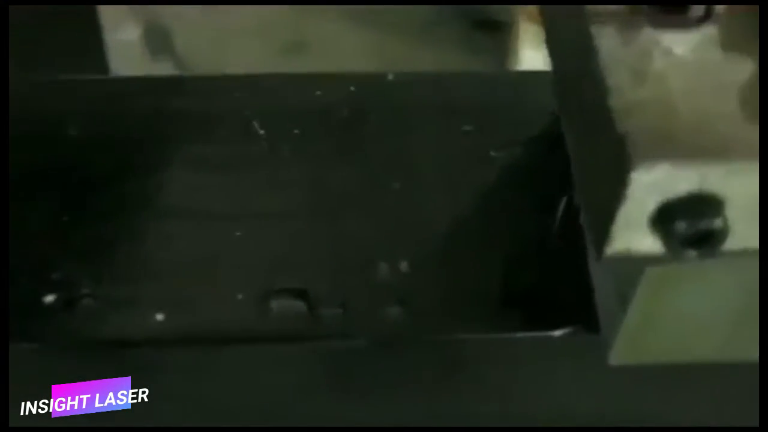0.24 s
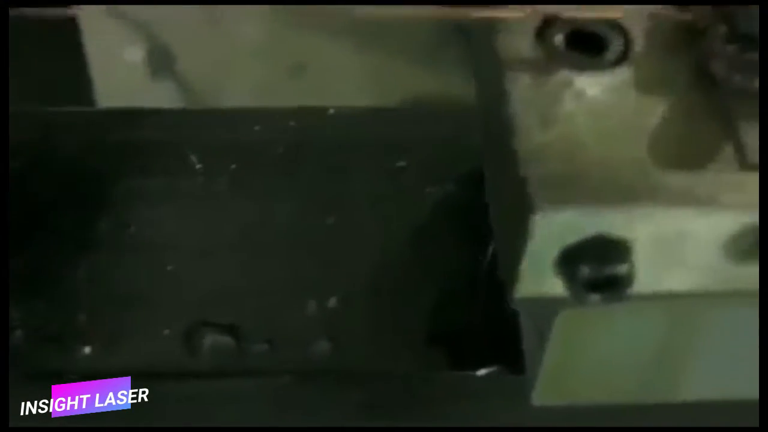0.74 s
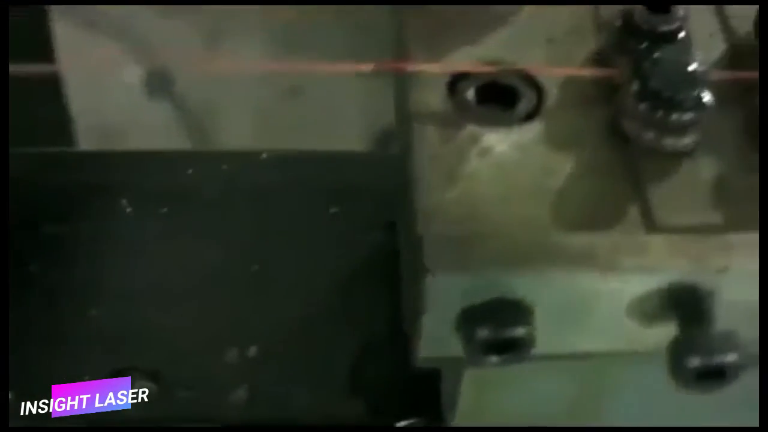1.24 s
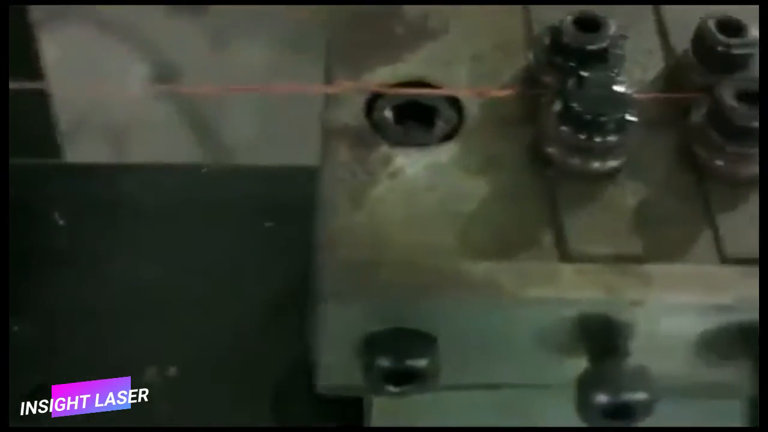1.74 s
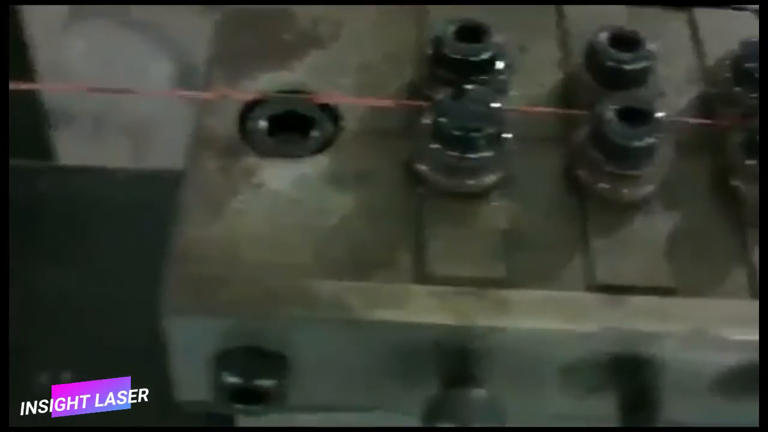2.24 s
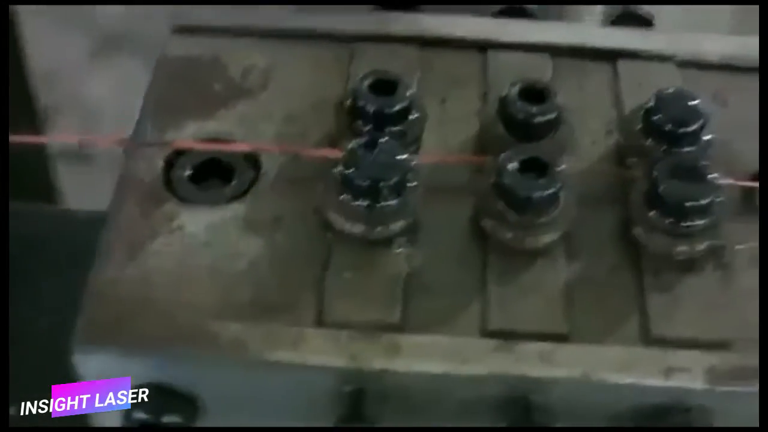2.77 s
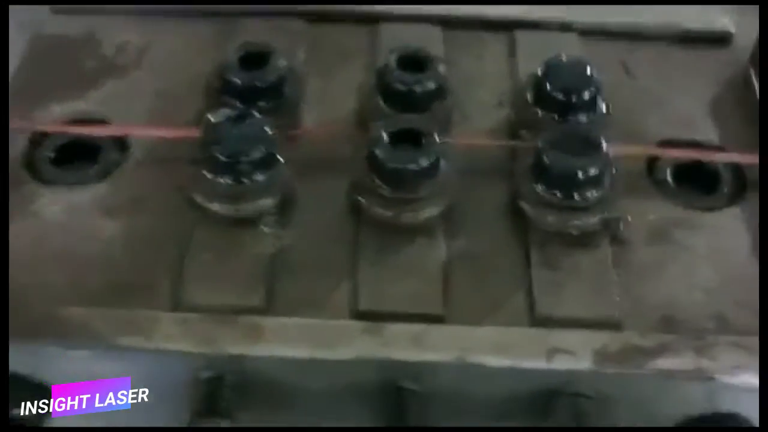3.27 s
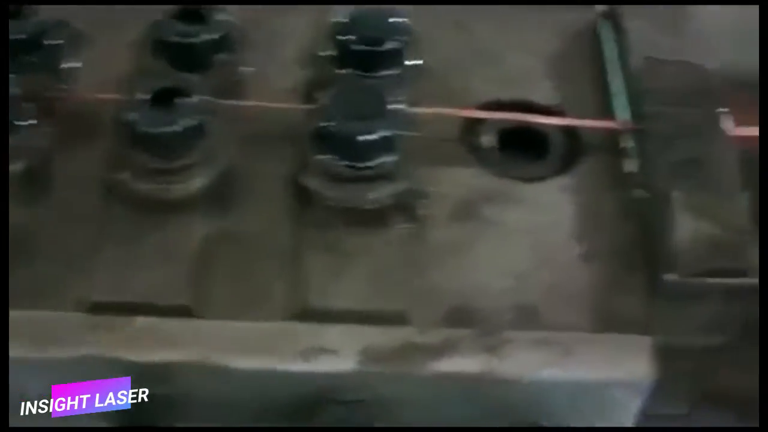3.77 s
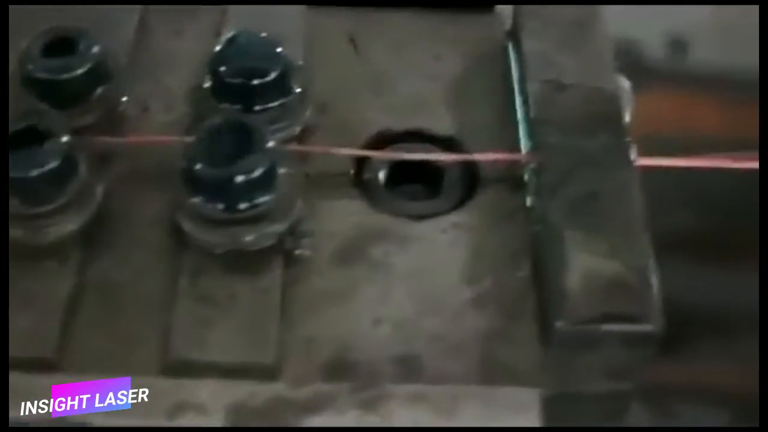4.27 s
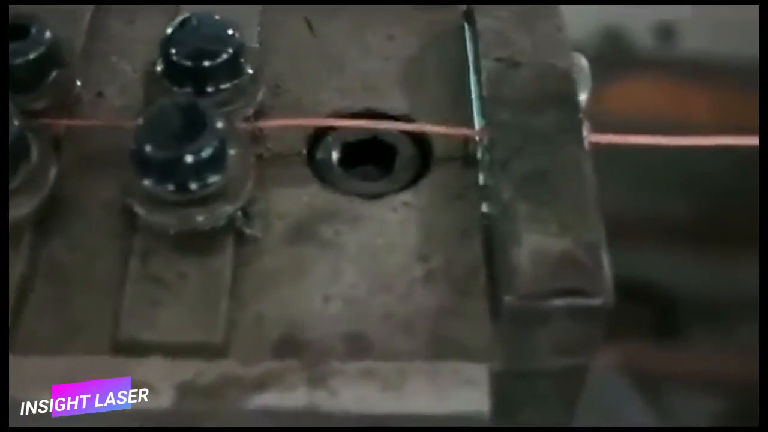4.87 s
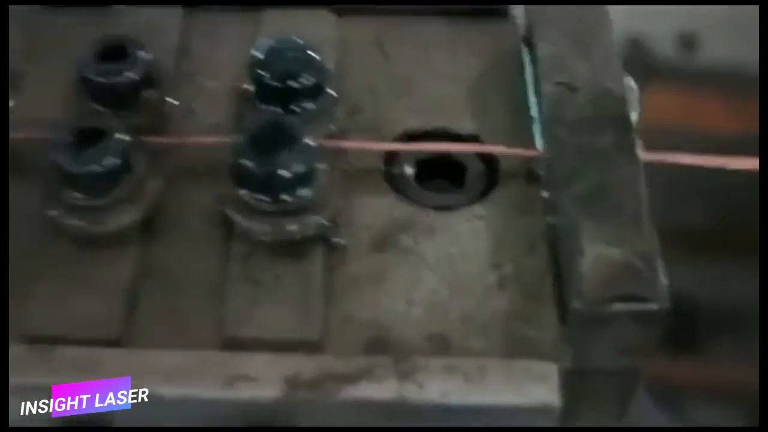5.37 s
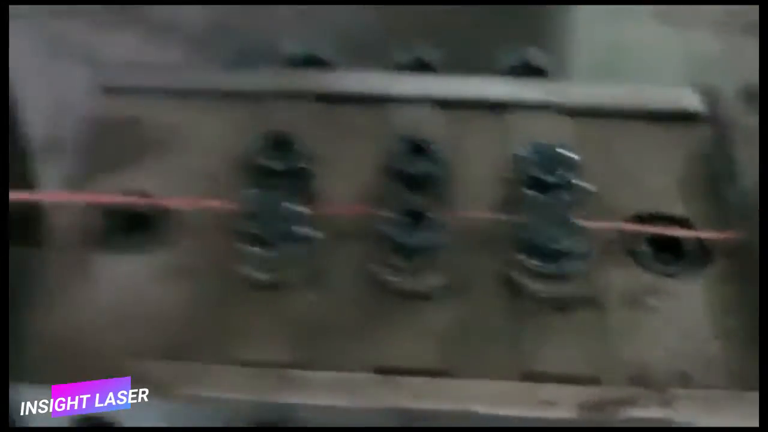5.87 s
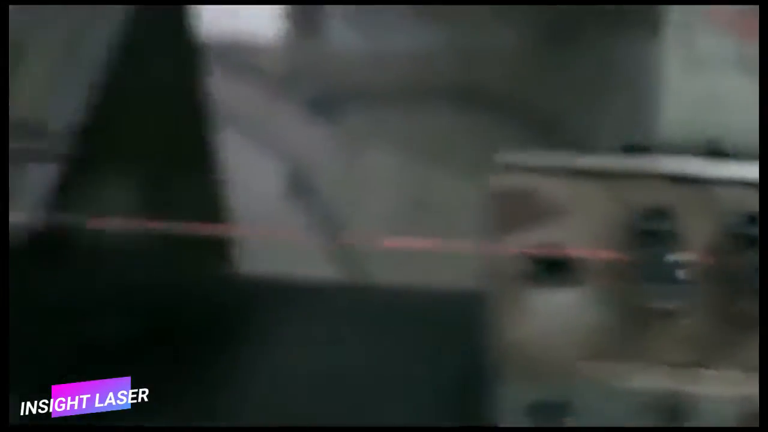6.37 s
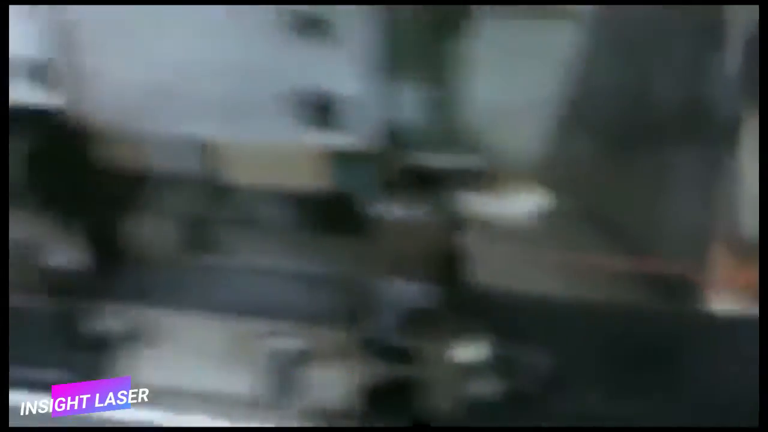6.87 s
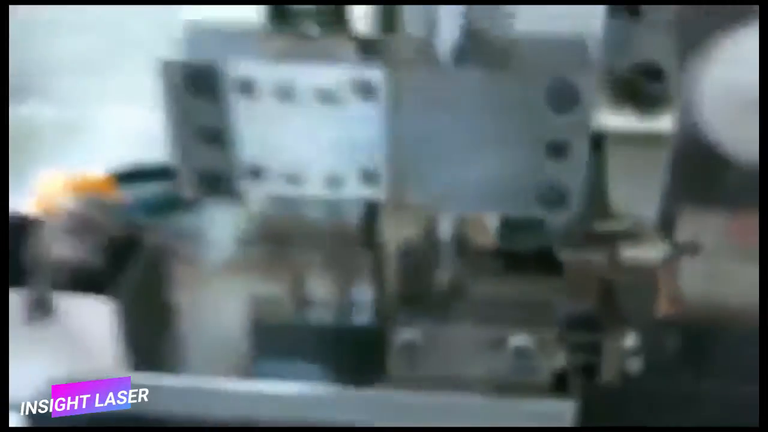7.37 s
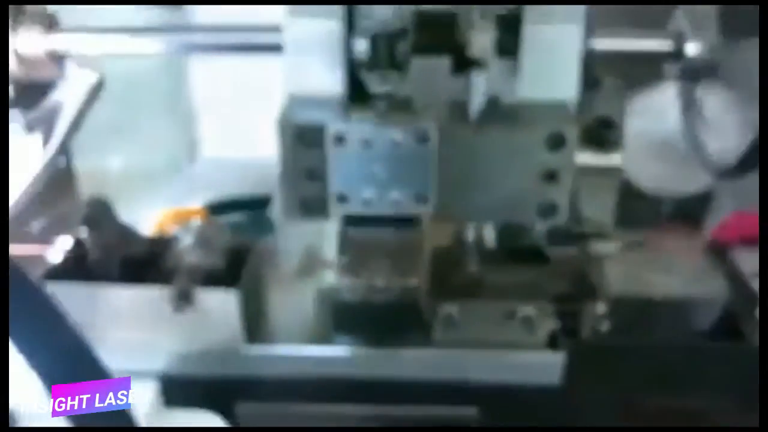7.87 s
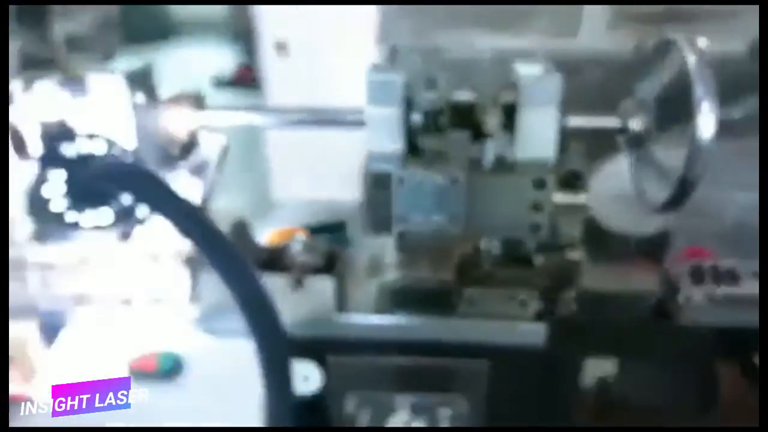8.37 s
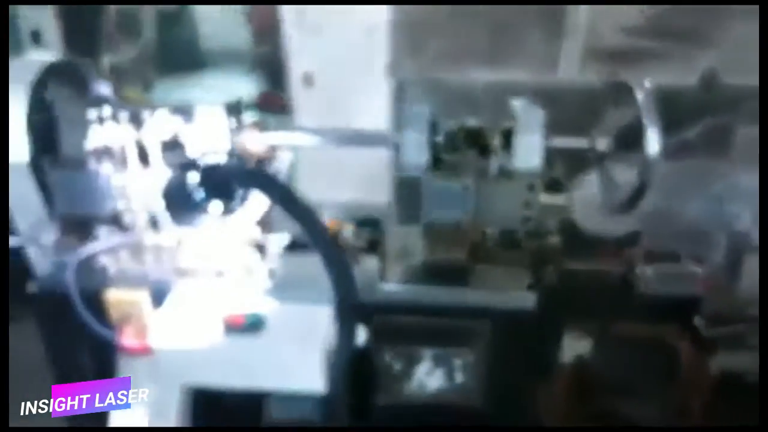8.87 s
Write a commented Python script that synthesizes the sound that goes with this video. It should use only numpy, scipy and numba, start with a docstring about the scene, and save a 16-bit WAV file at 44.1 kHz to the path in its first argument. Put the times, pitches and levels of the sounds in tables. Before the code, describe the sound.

Close, rapid metallic clacking, nearly three heavy strokes a second, over rattling slides and low rumble, with rough air bursts at the start and end.

```python
"""In a hall, close to a wire-forming machine: its camshaft turns steadily, with five tool blows and light ticks
every turn, over rattling slides, the rumble of the frame, groans and a few squeaks. Blows and taps ring banks of
decaying modes; the rest is filtered noise, clicks and tones. A hand-held phone moves along the machine; air rushing
over its two microphone ports buffets them in opposite sense and overloads the input at the strongest puffs."""
import sys
import numpy as np
from scipy import signal
from scipy.fft import rfft, irfft
from scipy.io import wavfile
from scipy.ndimage import uniform_filter1d, minimum_filter1d
from numba import njit

SR = 44100
rng = np.random.default_rng(int(sys.argv[2]) if len(sys.argv) > 2 else 0)


def store_wav(level_fs):
    """Save 16-bit WAV to argv[1]."""
    pcm = np.round(np.clip(np.atleast_2d(level_fs), -1, 1) * 32767)
    wavfile.write(sys.argv[1], SR, pcm.T.astype(np.int16))


N = 402633
T = np.arange(N) / SR
BOTH, OPPOSED = np.array([[1], [1]]), np.array([[1], [-1]])  # alike, or of opposite sign, left and right

# levels of the machine sounds over time:
# start_s, drone_db, rumble_db, rattle_db, blows_left_minus_right_db
LEVELS = [(0.0, -36.5, -31.5, -43.5, 2), (0.499, -36, -32.5, -39, 2.5), (0.689, -39, -35, -39.5, 0),
          (0.76, -34, -30.5, -41, 3.5), (1.08, -45, -36, -44.5, 4), (1.2, -40, -30.5, -39, 8),
          (1.5, -36.5, -26, -35, 6.5), (1.72, -38.5, -29.5, -38.5, -1.5), (2.099, -40.5, -33.5, -39.5, 4),
          (3.0, -35.5, -32.5, -38.5, 1), (3.2, -39.5, -35, -39, 6), (4.1, -38.5, -34.5, -37, 3.5),
          (4.7, -36, -31.5, -34.5, 8.5), (5.3, -37.5, -34.5, -39, 4), (5.899, -38.5, -31, -36.5, 3),
          (6.05, -42, -35.5, -40, 3), (6.5, -44, -37.5, -42.5, 0.5), (7.05, -40.5, -35, -42.5, 1),
          (7.75, -46, -36, -40.5, -2), (7.85, -59, -34.5, -44, 1), (8.12, -38.5, -36, -42.5, -1.2),
          (8.2, -52, -37, -42.5, -2), (8.5, -36, -38.5, -42.5, -1.5), (9.13, -43, -35.5, -45.5, -2)]
MACHINE_PAN_DB = -0.6  # left minus right, for the steady machine sounds
# unlike share of the two channels: pitch_hz, side_minus_mid_db
STEREO_WIDTH = [(60, -7.5), (300, -12), (1000, -6), (2800, -10), (4000, -23), (4800, -0.5), (7500, -10.5)]

# frame drone: pitch_hz, level_db (per Hz)
DRONE_SPECTRUM = [(25, -17.5), (60, -19), (100, -6.5), (125, 0.5), (165, -2), (250, 2), (320, -0.5)]
# wavering motor hum: pitch_hz, width_hz, level_db (against the drone)
MOTOR_HUMS = [(126.1, 8.7, -10), (356.7, 12, -8)]
# housing rumble: pitch_hz, level_db (per Hz)
RUMBLE_SPECTRUM = [(250, -17.5), (350, 1), (500, -5.5), (700, 0.5), (1100, -9), (1500, -6.5), (2200, -19),
                   (3200, -18)]
# slide rattle: pitch_hz, level_db (per Hz)
RATTLE_SPECTRUM = [(500, 0), (1000, -2.5), (1500, 3.5), (2300, 3), (3200, -8), (4300, -11), (5000, -10.5),
                   (6100, -8), (7400, -11.5)]
# rattle through one turn: offset_s (from the main blow), level_db
SLIDE_STROKE = [(-.25, -4), (-.21, 1), (-.17, -1), (-.14, 4), (-.12, 0), (-.09, -1), (-.06, 7), (-.026, -3),
                (-.016, 10), (-.005, 7.5), (.004, 10), (.03, 5.5), (.055, 7), (.075, 1), (.107, -2)]
# steady fine rattle: pitch_hz, level_db (per Hz)
FIZZ_SPECTRUM = [(3400, 1), (4300, 0), (5400, -1.5), (7000, -2.5)]
FIZZ_DB = -18  # in the slide rattle

# slow course of the wind: start_s, level_db
BREEZE_LEVELS = [(0, -16.5), (.35, -26), (.5, -35), (.95, -32), (1.1, -44), (1.7, -38), (1.9, -33),
                 (2.15, -38), (3.4, -40.5), (4.3, -38.5), (4.7, -48), (6, -52), (6.4, -35.5), (7.0, -31),
                 (7.45, -33), (7.9, -18), (8.02, -37.5), (8.2, -19), (8.265, -28), (8.31, -22),
                 (8.425, -29), (8.5, -16.5), (9.13, -25)]
# gusts: peak_s, peak_db, length_s (within 10 dB of the peak)
WIND_GUSTS = [(.045, -9, .08), (.15, -19, .07), (.235, -18, .13), (.37, -18, .08), (.594, -17, .05),
              (.668, -26, .05), (.793, -16, .05), (1.023, -13, .025), (1.285, -24, .05), (1.77, -25, .14),
              (1.92, -28, .06), (1.985, -27, .06), (3.445, -22, .06), (3.56, -27, .06), (4.096, -24, .05),
              (4.166, -24, .05), (4.42, -17, .07), (6.095, -28, .1), (6.171, -22, .04), (6.226, -16, .05),
              (6.283, -9, .05), (6.35, -19, .05), (6.515, -23, .07), (6.645, -27, .08), (6.752, -13.5, .06),
              (6.834, -20, .06), (7.09, -15, .05), (7.14, -15, .08), (7.24, -16, .04), (7.32, -23, .1),
              (7.56, -16.5, .11), (7.675, -18, .07), (7.752, -11, .11), (7.82, -16, .04), (7.92, -22, .1),
              (8.095, -11.5, .07), (8.143, -12, .05), (8.23, -13.5, .07), (8.347, -15, .05),
              (8.39, -12, .035), (8.461, -10, .042), (8.546, -13, .04), (8.582, -16, .03),
              (8.615, -16, .09), (8.72, -19, .13), (8.81, -14, .07), (8.875, -13, .09), (9.003, -9.5, .035),
              (9.1, -21, .06)]
GUST_SHAPE = 1.9  # 1 pointed, 2 rounded
# buffeting bands: pitch_hz, width_hz, level_db, gained_db (for each dB of wind)
BUFFET_BANDS = [(55, 60, -9, .05), (110, 120, 0, 0), (210, 200, -2, .1), (380, 300, -3, .3),
                (650, 400, -9, .45), (1000, 450, -20, .5)]
# deepest buffeting, alike at both ports; its level holds at a wind of -28.5 dB
SHARED_BASS_HZ, SHARED_BASS_DB = 60, -54
# strongest puffs: peak_s, peak_db, pitch_hz
PUFFS = [(0.03, -6, 226), (0.041, -8, 216), (0.0518, -12, 151), (0.0603, -3, 248), (0.0712, -7, 115),
         (0.1317, -2, 225), (0.3734, -5.7, 240), (0.7906, 5.5, 170), (1.024, -10, 180), (6.278, -20, 191),
         (6.2967, -13, 180), (7.133, 7, 313), (7.154, 5, 336), (7.5515, -6, 288), (7.5645, -10, 260),
         (7.7216, -3, 459), (7.815, 1, 537), (7.822, 6, 177), (7.8382, -5, 242), (8.1423, -2, 292),
         (8.2309, -2, 565), (8.35, -1.5, 516), (8.386, 3, 242), (8.397, 3.5, 370), (8.4533, -9, 262),
         (8.4658, 4.5, 321), (8.4752, -9, 252), (8.5077, -5, 395), (8.7884, -2, 168), (8.846, -3, 479),
         (8.8885, -4, 146), (8.993, 0, 229), (9.004, 0, 218)]

TURN_S, MAIN_BLOW_S = .35715, .577  # length of a turn; time of one main blow
# light ticks and thuds on every turn: offset_s (from the main blow), pitch_hz, width_hz, level_db, decay_s
TURN_TICKS = [(-.210, 3140, 2920, -31.5, 0.0049), (-.140, 2630, 2526, -36, 0.008),
              (-.110, 900, 507, -24.5, .006), (-.048, 2180, 1930, -42, 0.0046),
              (-.040, 499, 596, -25, .012), (-.010, 697, 704, -25, 0.0073), (0.074, 360, 300, -30, 0.015)]
# dull bumps through the hand, alike at both ports: start_s, level_db, pitch_hz
HAND_BUMPS = [(0.024, -19.5, 243), (0.048, -21, 278), (0.35, -22.5, 242), (0.789, -25, 349),
              (3.429, -26.5, 133), (4.41, -28, 180), (7.098, -28.5, 163.5), (7.549, -28, 178),
              (7.745, -27, 145), (7.839, -29, 127), (8.069, -29, 196), (8.129, -31, 148),
              (8.17, -28.5, 200), (8.218, -24, 158), (8.337, -26, 127), (8.378, -23.5, 200),
              (8.447, -24, 354), (8.489, -24, 124), (8.537, -30, 125), (8.593, -24, 283), (8.7, -32, 173),
              (8.793, -24.5, 232), (8.848, -26, 162), (8.992, -20.5, 128)]
BUMP_CYCLES = 3.6  # the swell of a bump peaks after half as many

# tool blows: start_s, level_db, brightness_db (high minus low modes)
TOOL_BLOWS = [(0.11, -25, -21), (0.2017, -21.5, 8), (0.2196, -15.5, -2), (0.2377, -20, -10),
              (0.2664, -23.5, 8), (0.4657, -13, -13), (0.559, -16, -6), (0.5772, -6, 3), (0.596, -17, -11),
              (0.6252, -15.5, -7), (0.8246, -24, -6), (0.916, -22.5, -3), (0.9325, -12, 2),
              (0.9504, -18, 0), (0.979, -21, -2), (1.1845, -26, -6), (1.2737, -26, -3), (1.2922, -11, -1),
              (1.3104, -19, -1), (1.3396, -20, -4), (1.539, -17, -10), (1.6326, -19, -10), (1.649, -9, 1),
              (1.6662, -18, 2), (1.6963, -16, -8), (1.894, -17.5, -6.5), (1.988, -17.5, -4),
              (2.006, -11.5, -1), (2.023, -21, 3), (2.0511, -17, 1), (2.2485, -17.5, -9),
              (2.3458, -18.5, -4), (2.3619, -10, 0.5), (2.379, -19, 7), (2.4092, -15.5, -7),
              (2.607, -16, -3.5), (2.6992, -16, -6), (2.7156, -6.5, 4.5), (2.733, -17, -4),
              (2.761, -17.5, -9), (2.965, -16, -7), (3.06, -16, -2.5), (3.076, -6, 1.5), (3.093, -22.5, 12),
              (3.1216, -18.5, -22), (3.3236, -18, -3.5), (3.4154, -18, 2), (3.4336, -8.5, 2),
              (3.4516, -23, 0), (3.477, -17.5, -3.5), (3.681, -17, -9), (3.7738, -22, -1), (3.792, -9.5, 0),
              (3.8124, -22, -5), (3.8366, -17.5, -2), (4.035, -17, -10.5), (4.134, -18, 1),
              (4.149, -11, -2), (4.1683, -25, 10), (4.196, -25, 11), (4.392, -16.5, -7),
              (4.4844, -18.5, -7), (4.5036, -11.5, -2), (4.5216, -17, 2), (4.5533, -19, -13),
              (4.75, -15, -9), (4.842, -18.5, -2), (4.8612, -10.5, 0), (4.883, -25, -3), (4.907, -19, -8),
              (5.1086, -16, -7), (5.2, -18.5, -4), (5.217, -9.5, -5), (5.2363, -22, -2), (5.2633, -21, -6),
              (5.468, -17.5, -8), (5.5586, -21, -2), (5.576, -8, -0.5), (5.595, -19, -12), (5.622, -19, -7),
              (5.823, -16.5, -8.5), (5.916, -21, 14), (5.9342, -8.5, 2.5), (5.953, -21, 5), (5.98, -22, 1),
              (6.1776, -17, -4.5), (6.272, -19, -4), (6.291, -15, 4), (6.31, -23, 2), (6.3379, -27, -9),
              (6.5349, -22, -5.5), (6.629, -21, -4), (6.6484, -13.5, -7), (6.6654, -17, 0),
              (6.694, -21.5, 0), (6.895, -18.5, -3.5), (6.984, -17, -1), (7.002, -6.5, 6), (7.021, -27, -3),
              (7.049, -27, 13), (7.2553, -26, -6), (7.344, -20, 2), (7.361, -10.5, 4), (7.379, -20.5, 8),
              (7.405, -21.5, 1), (7.613, -27, -6), (7.703, -18.5, 21), (7.721, -14, 19), (7.74, -25, 1),
              (7.765, -25, 2), (7.968, -29, -3), (8.0607, -24, 7), (8.0777, -11, 8), (8.095, -23, -5),
              (8.12, -21.5, -4), (8.3233, -36, -3), (8.4152, -29, 10), (8.435, -15, 9), (8.4528, -28, -2),
              (8.4857, -29, -9), (8.68, -35, -5), (8.77, -23.5, 15), (8.7886, -9.5, 10), (8.8059, -30, 4),
              (8.8358, -23.5, -2), (9.04, -36, -2)]
# the five cams: offset_s (from the main blow), contact_s, chatter_s, chatter_db, knock_db, middle_modes_db
CAM_CONTACTS = [(-.110, .0013, 0.0068, -17.5, 19, -12.5), (-.017, 0.0019, 0.016, -4, 10, -4),
                (0, 0.0006, 0.012, -17, 16.5, -7), (.018, 0.0012, .011, -10, 11.5, 1.5),
                (.046, 0.002, 0.016, -7, 15, -0.1)]
# steel tooling: pitch_hz, t60_s, then level_db as each of the five cams excites it
TOOL_MODES = [(1424, 0.035, -14, -6, -5.5, -7.5, 1.5), (1516, .022, 9, -5.5, -4, -7, -5.5),
              (1733, .014, 0, -2, -23, -5, 1.5), (2170, 0.011, 1, 3, 5.5, 12.5, -3),
              (2380, 0.011, 1, -1, 0, 0, -14), (2920, 0.0089, 12.5, 10.5, -3.5, 5.5, 2.5),
              (3365, 0.013, -5, -3.5, -8, -5, -4), (3945, 0.015, -9, 3.5, -2, 1.5, -5.5),
              (4866, 0.01, 0.5, -4.5, -23.5, 4.5, 9.5), (5330, 0.009, 1, -2, -3, 9, -2),
              (5780, 0.009, -6.5, -1.5, 1, -2.5, 0.5), (6006, 0.008, -2, -2, 2, -1.5, 8),
              (6400, 0.009, -0.5, 1.5, -14, -4, -0.5), (7200, 0.01, -8, -3, -13, -7, -7)]
GROUP_HZ = 2600, 4500  # borders between low, middle and high tool modes
COLOUR_SCATTER_DB, PAN_SCATTER_DB = 3.5, 2  # from blow to blow
RISE_S = .0007  # time constant of the rings building up
RAGGED_DB, CHATTER_HZ = 4, 2800  # unevenness and mean rate of the small impacts in the chatter
HALL_T60_S, HALL_DB = 0.14, -16

# the housing groans as the tools take load: peak_s, length_s, level_db, pitch_hz
HOUSING_SURGES = [(0.397, 0.055, -36, 595), (0.558, 0.023, -27, 740), (0.758, 0.068, -29.5, 634),
                  (1.183, 0.025, -26.5, 1030), (1.335, 0.087, -30, 685), (1.441, 0.068, -34, 594),
                  (1.534, 0.081, -28, 640), (1.617, .05, -33, 523), (1.699, 0.031, -32, 724),
                  (1.976, 0.087, -29, 670), (2.329, 0.12, -32, 503), (2.691, 0.088, -30, 524),
                  (3.047, 0.07, -28.5, 695), (3.398, 0.065, -30.5, 510), (3.753, 0.054, -27.5, 760),
                  (3.814, 0.063, -31, 400), (4.122, 0.071, -27.5, 520), (4.47, 0.048, -30, 730),
                  (4.658, 0.026, -40, 370), (4.759, 0.044, -32, 514), (4.839, 0.057, -30, 600),
                  (5.188, 0.071, -30, 610), (5.54, 0.061, -31, 447), (5.89, 0.055, -38, 510),
                  (6.285, 0.062, -28, 398), (6.664, 0.039, -41, 610), (7.086, 0.041, -40, 470),
                  (7.319, 0.034, -34.5, 780), (8.132, 0.028, -27.5, 426), (8.352, 0.043, -31.5, 470),
                  (8.808, 0.091, -35.5, 437), (8.855, .025, -31.5, 460)]
SURGE_WIDTH = 0.96  # bandwidth as a share of the pitch
# a stop taps shortly before the tools close: start_s, peak_db
STOP_TAPS = [(0.5104, -25), (0.8664, -27), (1.2264, -28), (1.5824, -23), (1.935, -19), (2.2917, -26),
             (2.6484, -15), (3.0086, -20), (3.3684, -23), (3.7244, -23), (4.0804, -22), (4.4328, -20),
             (4.7945, -18), (5.1542, -23), (5.5104, -23), (5.8661, -19), (6.2218, -24), (6.5774, -29),
             (6.9356, -19), (7.2974, -27), (7.6535, -22), (8.0102, -29)]
# modes of the stop: pitch_hz, t60_s, level_db
STOP_MODES = [(1650, .012, -5.5), (2270, 0.011, 1), (2880, 0.0089, -2.5), (3700, .007, -9.5),
              (5600, .006, -12)]
# metal squeaks: peak_s, length_s, level_db
METAL_SQUEAKS = [(2.68, 0.044, -38), (2.76, 0.04, -29), (2.805, 0.03, -49), (2.856, 0.048, -42),
                 (2.89, 0.018, -48), (2.947, 0.035, -47)]
# the two partials of a squeak: pitch_hz, level_db
SQUEAK_PARTIALS = [(6065, 0), (3300, -13)]

# short level dips in given bands of the mid signal: start_s, end_s, level_db, from_hz, to_hz
MID_DIPS = [(.03, .07, -12, 900, 2500), (.025, .10, -24, 450, 750), (7.14, 7.175, -16, 250, 1300),
            (7.805, 7.845, -24, 30, 1100), (7.845, 7.915, -9, 200, 900), (8.0, 8.04, -14, 20, 150),
            (8.17, 8.24, -26, 620, 1100), (8.16, 8.21, -10, 250, 500), (8.33, 8.405, -26, 800, 1350),
            (8.44, 8.46, -14, 600, 1500), (8.465, 8.535, -32, 380, 900), (8.57, 8.61, -16, 550, 1050),
            (8.66, 8.68, -14, 100, 1300), (8.68, 8.745, -26, 450, 780), (8.885, 8.91, -12, 250, 900),
            (9.02, 9.05, -10, 200, 700)]
# ducking of the mid signal below the top when the side is loud
DUCK_ABOVE_DB, DUCK_DB_PER_DB, DUCK_LAG_S, DUCK_TOP_HZ = -11.5, 2.8, 0.049, 1220
TOP_HZ, FINAL_TOP_HZ = 7620, 14900  # low-pass edges before and after the limiter


def undb(db):
    """Turn decibels into an amplitude factor."""
    return 10 ** (np.asarray(db) / 20)


def unit(x):
    """Scale to an rms of 1."""
    return x / np.sqrt(np.mean(x ** 2))


def on_log(table, hz):
    """Read a (Hz, dB) table along a logarithmic frequency axis."""
    table_hz, table_db = np.transpose(table)
    return np.interp(np.log(hz), np.log(table_hz), table_db)


@njit
def svf(x, hz, width):
    """State-variable band-pass, gain 1 at the centre."""
    y, band, low = np.empty(len(x)), 0., 0.
    g, k = np.tan(np.pi * hz / SR), width / hz
    for i in range(len(x)):
        v = (band + g * (x[i] - low)) / (1 + g * (g + k))
        band, low, y[i] = 2 * v - band, low + 2 * g * v, k * v
    return y


def steep(x, hz, width):
    """The band-pass twice over, for steeper skirts."""
    once = svf(x + 1e-18, 1. * hz, 1. * width)
    return svf(once, 1. * hz, 1. * width)


def walk(rate):
    """Random levels held 1 / rate s and slewed; spread near 1."""
    hold = int(SR / rate)
    steps = np.repeat(rng.standard_normal(N // hold + 1), hold)
    return 1.8 * uniform_filter1d(steps, hold)[:N]


def grit(rate, spread_db):
    """Sparse clicks of either sign, a few much bigger than the rest."""
    clicks = (rng.random(N) < rate / SR) * rng.standard_normal(N)
    return clicks * undb(spread_db * np.minimum(rng.exponential(size=N), 4))


def add(out, s, sound):
    """Mix a short sound in at s seconds."""
    i = int(s * SR)
    if 0 <= i < N:
        out[..., i:i + sound.shape[-1]] += sound[..., :N - i]


def bank(spectrum, source, flicker_db, rate):
    """Third-octave bands that flicker alone, with an unlike part left and right."""
    out = 0
    low_hz, high_hz = spectrum[0][0], spectrum[-1][0]
    for hz in low_hz * 2 ** np.arange(0, np.log2(high_hz / low_hz) + 1 / 6, 1 / 3):
        mid = unit(steep(source(), hz, hz / 3))
        side = unit(steep(source(), hz, hz / 3))
        # the root turns a level per Hz into the level of a band
        gain = undb(on_log(spectrum, hz) + flicker_db * walk(rate)) * np.sqrt(hz)
        out = out + gain * (mid + undb(on_log(STEREO_WIDTH, hz)) * side * OPPOSED)
    return out / np.sqrt(np.mean(out.mean(0) ** 2))


def frame_drone():
    """Low noise of the frame in slow bands, with narrow noise bands as wavering motor hum."""
    hum = sum(undb(db) * unit(svf(rng.standard_normal(N), 1. * hz, 1. * width_hz))
              for hz, width_hz, db in MOTOR_HUMS)
    return bank(DRONE_SPECTRUM, lambda: rng.standard_normal(N), flicker_db=1.0, rate=9) + hum


def housing_rumble():
    """Noise roughened by sparse clicks, coloured as the housing."""
    return bank(RUMBLE_SPECTRUM, lambda: rng.standard_normal(N) + 5.0 * grit(150, 3.0), flicker_db=1.6, rate=24)


def slides():
    """Dense small clatter that swells while the tools close, over a steady fine fizz."""
    first_s = SLIDE_STROKE[0][0]
    offset = (T - MAIN_BLOW_S - first_s) % TURN_S + first_s
    stroke_db = np.interp(offset, *np.transpose(SLIDE_STROKE))
    fizz = bank(FIZZ_SPECTRUM, lambda: rng.standard_normal(N) + 3 * grit(500, 2.5), flicker_db=2.5, rate=30)
    rattle = bank(RATTLE_SPECTRUM, lambda: rng.standard_normal(N) + 3.5 * grit(500, 2.5), flicker_db=1.6, rate=45)
    return undb(FIZZ_DB) * fizz + undb(stroke_db) * rattle


def wind_level():
    """Wind in dB: the breeze, or the strongest gust where that is louder."""
    t = T[::64]
    gusts = [peak_db - 10 * abs(2 * (t - s) / length) ** GUST_SHAPE for s, peak_db, length in WIND_GUSTS]
    breeze = np.interp(t, *np.transpose(BREEZE_LEVELS))
    return np.interp(T, t, np.max([breeze, *gusts], axis=0))


def eddies(wind_db):
    """Lumpy low noise of air thumping a port; faster air makes it brighter."""
    whirl = (grit(1000, 1.9) + 0.087 * rng.standard_normal(N)) * undb(1.4 * walk(60))
    whirl = signal.sosfilt(signal.butter(2, 900, fs=SR, output="sos"), whirl)
    out = np.zeros(N)
    for k, (hz, width_hz, band_db, gained) in enumerate(BUFFET_BANDS):
        level_db = wind_db + band_db + gained * (wind_db + 15)
        # neighbouring bands alternate in sign so that they join without a notch
        out += (-1) ** k * undb(level_db) * unit(steep(whirl, hz, width_hz))
    return out


def wind():
    """Eddies push the two ports in opposite sense, with a small part and deep bass alike at both."""
    wind_db = wind_level()
    bass_db = SHARED_BASS_DB + 0.6 * (wind_db + 28.5) + 3.5 * walk(8)
    bass = undb(bass_db) * unit(steep(rng.standard_normal(N), SHARED_BASS_HZ, SHARED_BASS_HZ))
    # the lumpy part that is alike at both ports grows more slowly than the wind
    shared_db = -23 - 0.35 * (wind_db + 19.5) + 1.4 * walk(25)
    return undb(-2.5) * eddies(wind_db) * OPPOSED + bass + undb(shared_db) * eddies(wind_db)


def ticks():
    """Followers and stops tick and thud as noise bursts at the same cam angles, a little differently every turn."""
    out, t = np.zeros(N), np.arange(2048) / SR
    for offset, hz, width_hz, db, decay in TURN_TICKS:
        shape = np.zeros(N)
        pulse = (1 - np.exp(-t / 0.0014)) * np.exp(-t / decay)
        for turn, (late, size) in zip(range(-2, 25), rng.standard_normal((27, 2))):
            s = MAIN_BLOW_S + turn * TURN_S + offset + 0.0014 * late
            add(shape, s, undb(2.5 * size) * pulse)
        out += undb(db) * shape * unit(svf(rng.standard_normal(N), 1. * hz, 1. * width_hz))
    return out


def puffs():
    """Each strong puff is one swing of pressure, of opposite sense at the two ports."""
    out = np.zeros(N)
    for (s, peak_db, hz), sign in zip(PUFFS, rng.choice([-1, 1], len(PUFFS))):
        t = np.linspace(-2 / hz, 2 / hz, int(4 * SR / hz))
        swing = np.cos(2 * np.pi * hz * t) * np.exp(-(1.7 * hz * t) ** 2)
        add(out, s + t[0], sign * undb(peak_db) * swing)
    return out * OPPOSED


def bumps():
    """Each bump through the hand is a few swings of one low tone."""
    out = np.zeros(N)
    for (s, db, hz), phase in zip(HAND_BUMPS, rng.random(len(HAND_BUMPS))):
        turns = np.arange(int(3 * BUMP_CYCLES * SR / hz)) * hz / SR
        rise = 2 * turns / BUMP_CYCLES
        swell = rise * np.exp(1 - rise ** 2 / 2) / np.sqrt(np.e)
        add(out, s, undb(db) * swell * np.sin(2 * np.pi * (turns + phase)))
    return out


def contact_force(t, lead, contact, chatter, chatter_db, knock_db):
    """A sharp knock inside a rough push, followed by decaying chatter; the second row lacks the knock."""
    impacts = (rng.random(len(t)) < CHATTER_HZ / SR) * undb(RAGGED_DB * rng.standard_normal(len(t)))
    impacts = impacts * np.sqrt(SR / CHATTER_HZ)
    push = np.exp(-.5 * ((t - lead) / contact) ** 2)
    push = push + undb(chatter_db) * impacts * (t > lead) * np.exp(-(t - lead) / chatter)
    force = push * rng.standard_normal((2, len(t)))
    force[0, int(lead * SR)] += undb(knock_db)
    return force


def tool_rings(t, tool, cam):
    """Decaying tool modes, slightly detuned and re-weighted for each blow."""
    detune, tilt = rng.standard_normal((2, len(tool), 1))
    hz, t60 = tool[:, :1] * (1 + 0.025 * detune), tool[:, 1:2]
    envelope = (1 - np.exp(-t / RISE_S)) * np.exp(-np.log(1000) * t / t60) / np.sqrt(t60)
    return undb(tool[:, 2 + cam, None] + 1.5 * tilt) * envelope * np.sin(2 * np.pi * hz * t)


def blows(pan_db):
    """Each tool contact rings three groups of steel modes, balanced by the brightness of the blow."""
    out, t, lead = np.zeros((2, N)), np.arange(4096) / SR, .004
    tool, cams = np.array(TOOL_MODES), np.array(CAM_CONTACTS)
    group = np.searchsorted(GROUP_HZ, tool[:, 0])
    for (s, level_db, bright_db), chance in zip(TOOL_BLOWS, rng.standard_normal((len(TOOL_BLOWS), 2))):
        # the cam is the one whose place in the turn lies nearest
        away = (s - MAIN_BLOW_S - cams[:, 0] + TURN_S / 2) % TURN_S - TURN_S / 2
        cam = np.argmin(abs(away))
        *contact_settings, middle_db = cams[cam, 1:]
        share = undb([-bright_db / 2, middle_db + COLOUR_SCATTER_DB * chance[0], bright_db / 2])
        share /= np.sqrt((share ** 2).sum())
        lean_db = pan_db[int(s * SR)] + PAN_SCATTER_DB * chance[1]
        force = contact_force(t, lead, *contact_settings)
        rings = tool_rings(t, tool, cam)
        for g in range(3):
            pair = irfft(rfft(force) * rfft(rings[group == g].sum(0)))
            # level both parts by their strongest short-time power
            mid, side = pair / np.sqrt(2 * uniform_filter1d(pair ** 2, size=40).max(1, keepdims=True))
            width = undb(on_log(STEREO_WIDTH, tool[group == g, 0].mean()) + 1.5)
            gain = share[g] * undb(level_db + lean_db / 2 * OPPOSED)
            add(out, s - lead - .001, gain * (mid + width * side * OPPOSED))
    return out


def hall(hits):
    """A dull decaying noise tail, different at each microphone."""
    t = np.arange(int(.5 * SR)) / SR
    decay = np.exp(-np.log(1000) * t / HALL_T60_S) * (1 - np.exp(-t / 0.0061))
    tail = rng.standard_normal((2, len(t))) * decay
    tail /= np.sqrt((tail ** 2).sum(1, keepdims=True))
    return undb(HALL_DB) * signal.fftconvolve(hits[None], tail)[:, :N]


def surges():
    """Groans: short swells of rough noise in one housing resonance each."""
    out, t = np.zeros(N), np.arange(-8192, 8192) / SR
    for s, length, db, hz in HOUSING_SURGES:
        tone = unit(steep(rng.standard_normal(len(t)), hz, SURGE_WIDTH * hz))
        add(out, max(s + t[0], 0), undb(db) * np.exp(-(2 * t / length) ** 4) * tone)
    return out


def taps():
    """A short rough contact rings the modes of the stop."""
    out, t, modes = np.zeros(N), np.arange(1024) / SR, np.array(STOP_MODES)[:, :, None]
    for s, peak_db in STOP_TAPS:
        hz = modes[:, 0] * (1 + .03 * rng.standard_normal((len(modes), 1)))
        decay = undb(modes[:, 2]) * np.exp(-np.log(1000) * t / modes[:, 1])
        ring = (decay * np.sin(2 * np.pi * hz * t)).sum(0)
        tap = np.convolve(ring, np.hanning(50) * rng.standard_normal(50))
        add(out, s, undb(peak_db) * tap / abs(tap).max())
    return out


def squeaks():
    """Thin chirps of two partials, slightly rough in pitch and level."""
    swell = sum(undb(db) * np.exp(-(2 * (T - s) / length) ** 2) for s, length, db in METAL_SQUEAKS)
    warped_s = np.cumsum(1 + .003 * walk(200) + .002 * walk(25)) / SR
    tones = sum(undb(db) * np.sin(2 * np.pi * hz * warped_s) for hz, db in SQUEAK_PARTIALS)
    return swell * undb(2 * walk(110)) * tones


def dip_mid(x):
    """Short level dips in given bands of the mid signal, with soft edges."""
    mid = x.mean(0)
    for start, end, db, *band_hz in MID_DIPS:
        near = slice(max(int((start - .05) * SR), 0), int((end + .05) * SR))
        inside = abs(T[near] - (start + end) / 2) < (end - start) / 2
        gate = uniform_filter1d(1. * inside, size=300)
        band = signal.sosfiltfilt(signal.butter(3, band_hz, "band", fs=SR, output="sos"), mid[near])
        mid[near] -= gate * (1 - undb(db)) * band
    return x - x.mean(0) + mid


def scene():
    """The machine at its changing levels, the hits with their hall, wind over the ports and bumps in the hand."""
    s, *columns = np.transpose(LEVELS)
    drone_db, rumble_db, rattle_db, pan_db = (np.interp(T, s, column) for column in columns)
    machine = undb(drone_db) * frame_drone() + undb(rumble_db) * housing_rumble()
    machine = machine + undb(rattle_db) * slides() + surges() + squeaks()
    # the ticks follow the rattle level, more gently
    hits = blows(pan_db) + taps() + undb(0.71 * (rattle_db + 35.5)) * ticks() * BOTH
    air = wind() + puffs()
    return dip_mid(machine * undb(MACHINE_PAN_DB / 2 * OPPOSED) + hits + hall(hits.mean(0)) + air) + bumps()


def duck_mid(x):
    """The mid signal below 1220 Hz is ducked, a moment late, when the side is loud."""
    mid, side = (x[0] + x[1]) / 2, (x[0] - x[1]) / 2
    keep = np.exp(-1 / (DUCK_LAG_S * SR))
    power = side ** 2
    for _ in range(2):
        power = signal.lfilter([1 - keep], [1, -keep], power)
    excess_db = np.maximum(10 * np.log10(power + 1e-12) - DUCK_ABOVE_DB, 0)
    gain = undb(-DUCK_DB_PER_DB * excess_db)
    low_mid = signal.sosfiltfilt(signal.butter(3, DUCK_TOP_HZ, fs=SR, output="sos"), mid)
    return x - (1 - gain) * low_mid


def record(dry):
    """Ducking of the mid; a hard knee at the input, a quick limiter for the ringing peaks; the top is cut."""
    x = duck_mid(dry)
    overloaded = .96 * x / (1 + np.abs(x) ** 8) ** (1 / 8)
    x = signal.sosfilt(signal.ellip(9, .2, 70, TOP_HZ, fs=SR, output="sos"), overloaded)
    gain = minimum_filter1d(np.minimum(1, .89 / (np.abs(x) + 1e-9)), size=129)
    limited = x * uniform_filter1d(gain, size=65)
    return signal.sosfilt(signal.ellip(8, .2, 70, FINAL_TOP_HZ, fs=SR, output="sos"), limited)


dry = scene()
out = record(dry)
store_wav(out)
```